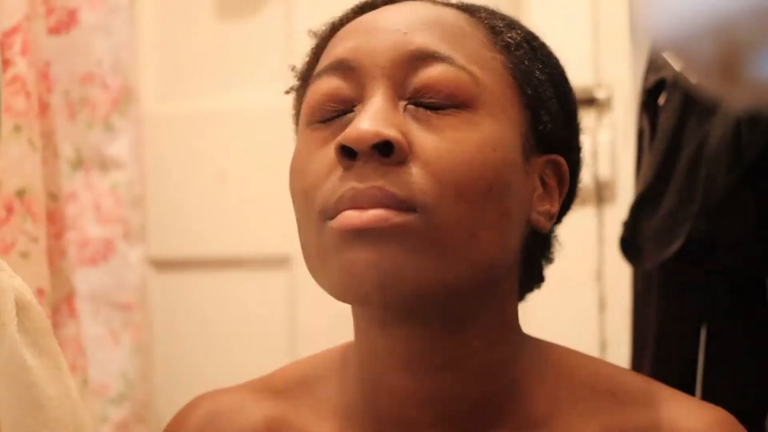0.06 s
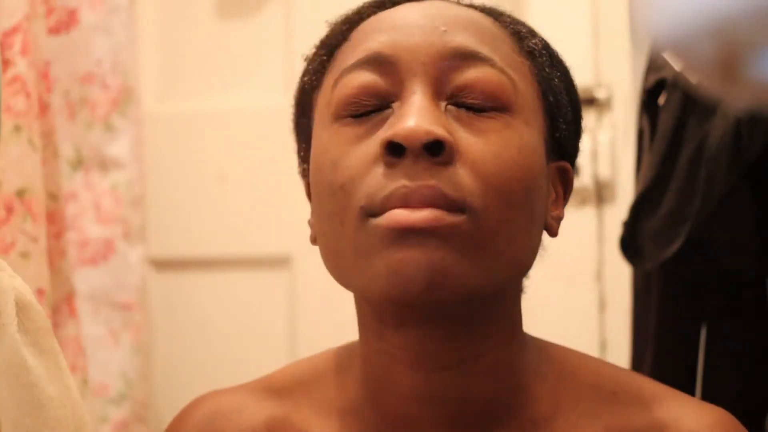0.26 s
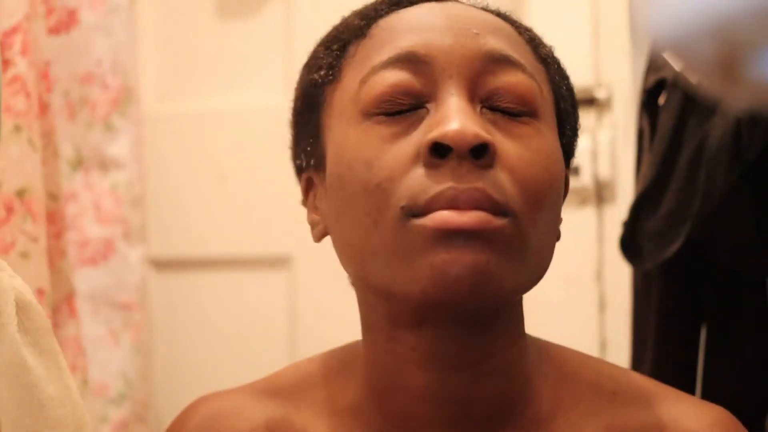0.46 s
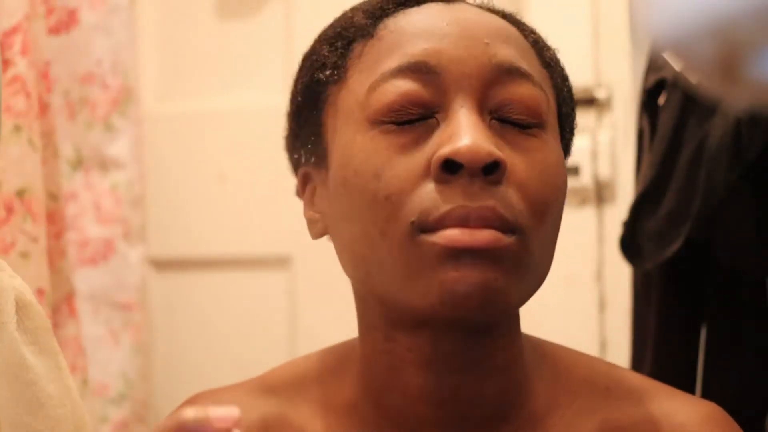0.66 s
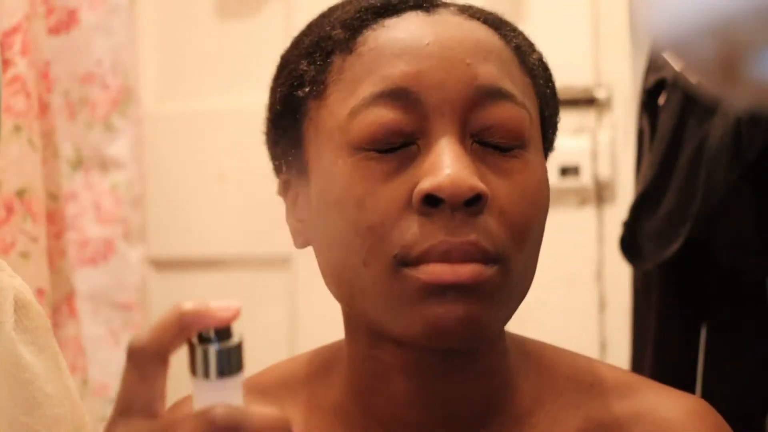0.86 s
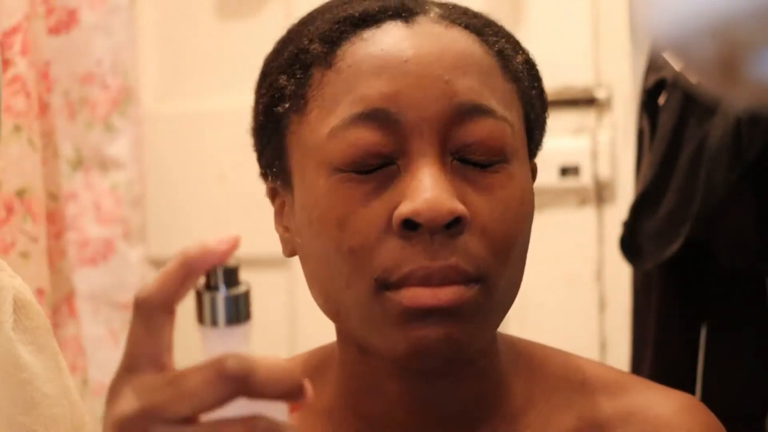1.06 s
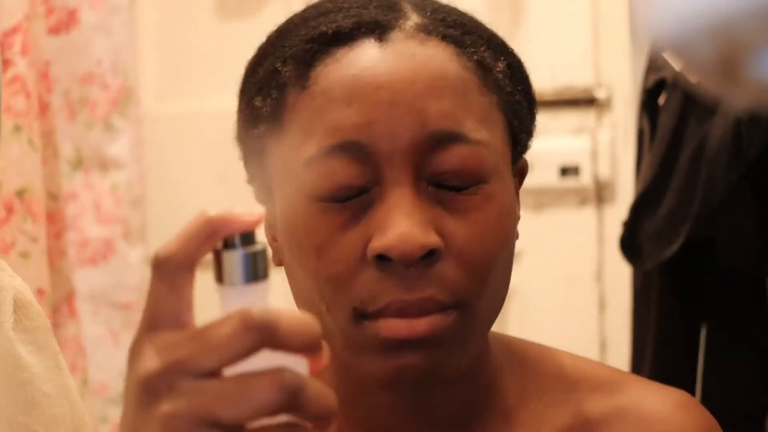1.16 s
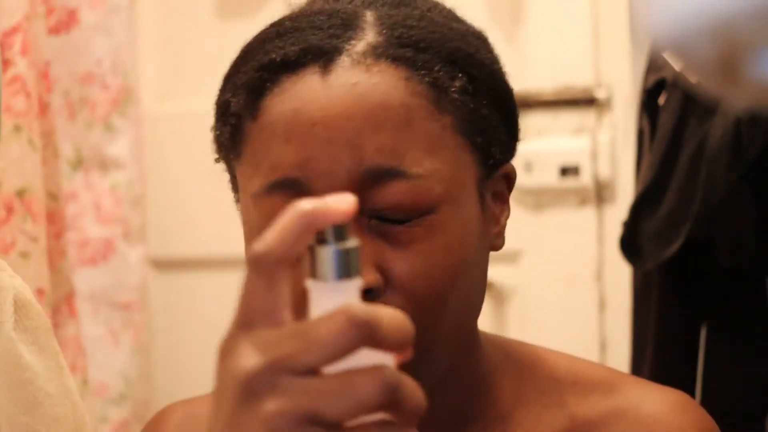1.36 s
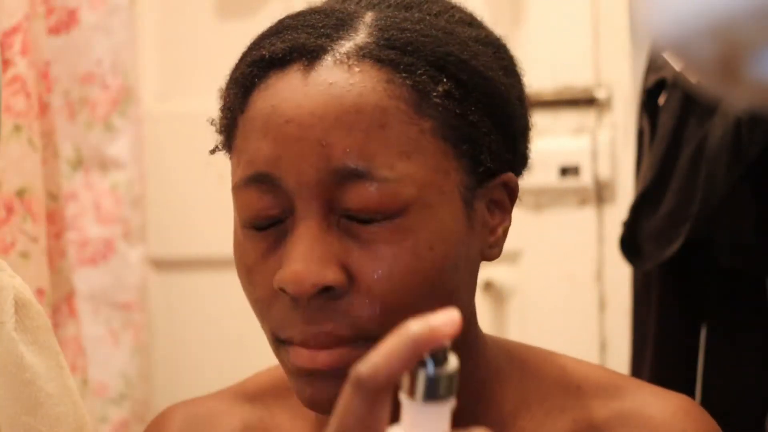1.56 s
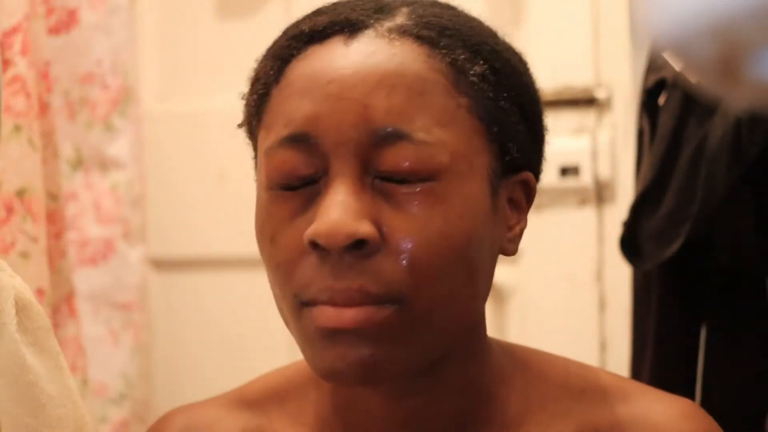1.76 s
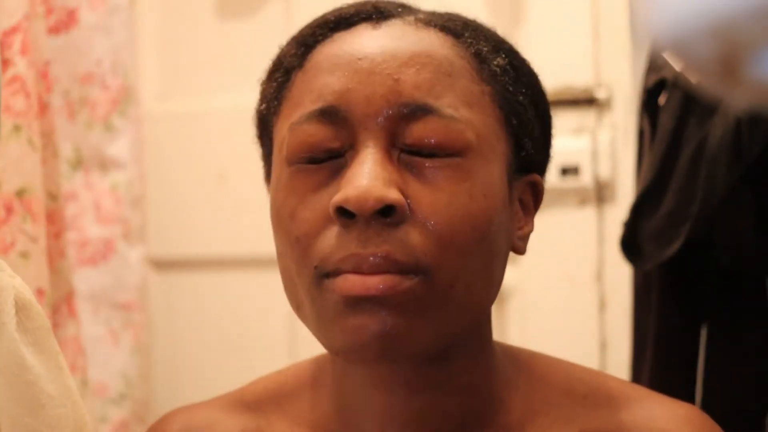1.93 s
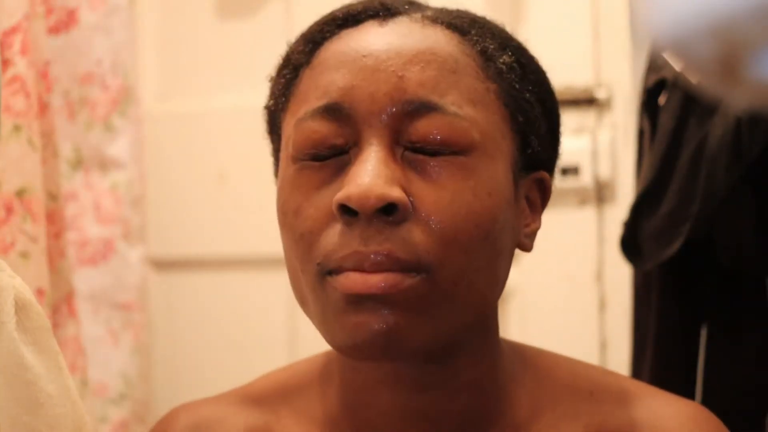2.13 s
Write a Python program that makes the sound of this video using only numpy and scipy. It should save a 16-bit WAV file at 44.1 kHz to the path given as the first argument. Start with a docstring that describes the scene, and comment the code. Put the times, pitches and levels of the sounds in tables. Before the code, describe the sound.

A small fine-mist spray bottle is pumped eight times, close to the microphone. Short, bright hisses come at about 0.1, 0.4, 0.6, 0.9, 1.2, 1.5, 1.7 and 2.0 seconds, each starting with a tiny spit and a slight plastic rub. Between sprays the plunger knocks lightly back and refills with a faint slurp. The bathroom's hard walls add a short echo over a quiet background.

```python
"""A small fine-mist pump bottle sprays eight times in a bathroom, close to the microphone.
The nozzle spits as the valve opens, then hisses with broadband noise that follows the flow.
Stick-slip friction of the piston drives the bottle's resonances on the way down; the plunger
knocks back up, and the pump refills with a small slurp. Hard walls add a short
reverberation, over a quiet background."""
import sys
import numpy as np
from scipy import signal
from scipy.fft import rfft, irfft
from scipy.io import wavfile
from scipy.ndimage import uniform_filter1d

SR = 44100
rng = np.random.default_rng(int(sys.argv[2]) if len(sys.argv) > 2 else 0)


def put_to_file(sound):
    """Save the sound as 16-bit audio at rate SR, in the file named by the first command-line argument."""
    columns = np.atleast_2d(sound).T  # one column per channel
    safe = np.clip(columns, -1, 1)
    whole_steps = np.round(safe * 32767)
    wavfile.write(sys.argv[1], SR, whole_steps.astype(np.int16))


N = 96755
T = np.arange(N) / SR
BIN_HZ = np.fft.rfftfreq(2 * N, 1 / SR)
SLIP_S = 0.0125   # from the start of a stroke to the seal's first slip

# Strokes of the pump. Each row: start and spray length in seconds, mist and spit levels in dB,
# time to the hardest push and its width in seconds, judder level in dB, spit decay in seconds,
# squelch level in dB. Levels in all tables are relative.
STROKES = [(0.0769, 0.13, -38.5, -39.5, 0.031, 0.011, -36.5, 0.042, -42.5),
           (.4000, 0.099, -38.5, -44, 0.0049, .010, -38.5, 0.029, -44),
           (0.6478, 0.13, -40.5, -39.5, 0.035, 0.019, -36.5, 0.06, -42),
           (0.9186, .120, -39, -38.5, 0.033, 0.019, -32.5, 0.022, -43),
           (1.1980, 0.13, -39.5, -38, 0.034, 0.025, -34, 0.047, -38.5),
           (1.4653, 0.11, -39, -37.5, 0.031, .017, -32.5, 0.031, -68),
           (1.7240, 0.099, -38, -38, 0.031, 0.022, -35, .030, -38.5),
           (1.9874, 0.078, -38.5, -40, 0.033, 0.027, -34.5, 0.044, -43.5)]
# Modes of the air pocket in the pump chamber. Each row: frequency and bandwidth in Hz, level in dB.
CHAMBER_MODES = [(324, 50, -19.5), (1060, 130, -12), (1972, 102, 1), (2580, 360, -10), (2850, 340, -5)]


def mist():
    """Flow noise: one patch of the cloud hisses in proportion to the flow, with a random flutter."""
    # Spectrum of the hiss. Each row: frequency in Hz, level in dB.
    spectrum = [(100, -56), (330, -14), (700, -6.5), (1200, -8), (2000, -3.5), (3000, 2.5), (4000, -0.5),
                (6200, 0), (10000, -2.5), (15500, -2.5)]
    flow = sum(from_db(db) * spray_flow(s, length) for s, length, db, *_ in STROKES)
    flutter, flutter_db = uniform_filter1d(noise(), size=200), 1.44
    hiss = flow * from_db(-flutter_db * flutter / flutter.std()) * noise()
    return through(hiss, response(spectrum))


def spray_flow(s, length):
    """Pressure-driven flow builds, sags with the pressure and dies as the piston bottoms out."""
    opening, rise_s, sag_db_per_s, release_db_per_s = 0.37, 0.06, 8.5, 405
    age = np.maximum(T - s, 0)
    build = (T > s) * np.minimum(opening + age / rise_s * (1 - opening), 1)
    return build * from_db(-sag_db_per_s * age - release_db_per_s * np.maximum(age - length, 0))


def nozzle():
    """Starting transient of the jet: the nozzle spits, fading as the mist forms."""
    # Spectrum of the spit. Each row: frequency in Hz, level in dB.
    spectrum = [(200, -34), (1200, -6), (3000, -23), (4800, -14), (6100, 0), (7300, -7), (8300, 5.5),
                (9500, -0.5), (10800, -11), (15500, -37)]
    spit = sum(from_db(db - 4) * burst(s, decay_s) for s, _, _, db, _, _, _, decay_s, _ in STROKES)
    return through(spit * noise(), response(spectrum))


def valve():
    """Brief transients are broadband: a bright tick as the valve opens, a weaker at the first slip."""
    # Spectrum of the tick. Each row: frequency in Hz, level in dB.
    spectrum = [(200, -13.5), (1200, -13), (2600, -6), (4000, -7.5), (6100, 1), (7400, -3.5), (9200, 3.5),
                (10500, -5.5), (15500, -11)]
    decay_s, rise_s = 0.0013, 0.0001
    ticks = 0
    for s, _, _, db, *_ in STROKES:
        pair = burst(s, decay_s, rise_s) + from_db(-3) * burst(s + SLIP_S, decay_s, rise_s)
        ticks += from_db(db + 8.5) * pair
    return through(ticks * noise(), response(spectrum))


def piston(bottle):
    """Stick-slip friction: the seal shakes the bottle in a quickening run, most at the hardest push."""
    # Spectrum of the rubbing seal. Each row: frequency in Hz, level in dB.
    rub_spectrum = [(150, -17), (400, -6), (1200, -7), (2800, -5), (3700, -6.5), (6000, -4.5), (9000, -7),
                    (15500, -19)]
    interval_ratio, jitter_s = 0.94, 0.00075
    delays = np.cumsum(SLIP_S * interval_ratio ** np.arange(10))
    slips, drag = 0, 0
    for s, length, _, _, peak_s, width_s, db, _, _ in STROKES:
        push = from_db(db + 8) * np.exp(-0.5 * abs((delays - peak_s) / width_s) ** 2.06)
        times = s + delays + rng.normal(0, jitter_s, len(delays))
        slips += sum(gain * burst(t, decay_s=0.0029) for t, gain in zip(times, push))
        drag += from_db(db - 21.5) * spray_flow(s, length)
    force = slips + drag
    judder = through(force * noise(), bottle)
    rub = through(force * noise(), response(rub_spectrum))
    return judder + from_db(-3.5) * rub


def bottle_ring():
    """Modal response of the bottle; a body small against the wavelength radiates little bass."""
    # Modes of the bottle and hand. Each row: frequency and bandwidth in Hz, level in dB.
    modes = [(275, 8, -23), (333.6, 23.5, 1), (370, 50, -4), (407.4, 55, -7.5), (481, 130, -9.5),
             (796, 17, -12), (860, 60, -6), (1102, 89, -9), (1448, 200, -11.5), (2015, 144, -5),
             (2086, 79, 1), (2520, 70, -2), (2900, 67, 0), (3213, 75, -8.5)]
    bass_cut = signal.butter(3, 245, "high", fs=SR, output="sos")
    radiation = signal.sosfreqz(bass_cut, BIN_HZ, fs=SR)[1]
    return resonances(modes) * radiation


def pump_head(bottle):
    """Impact excitation: the soft finger lands with a thud; hard snaps of the head ring the bottle."""
    # Snaps of the pump head. Each row: start in seconds, level in dB.
    snaps = [(0.3998, -30.5), (0.6773, -33), (1.4965, -29), (2.189, -38)]
    landings = from_db(-43.5) * sum(burst(s, decay_s=0.0096) for s, *_ in STROKES)
    thud = through(landings * noise(), resonator(hz=374, width_hz=37))
    grit = sum(from_db(db + 6.5) * burst(s, decay_s=0.00067) for s, db in snaps) * noise()
    return thud + through(from_db(19.5) * clicks(snaps) + grit, bottle)


def plunger(bottle):
    """Damped vibration after impact: the returning plunger knocks and rattles, and its spring clucks."""
    # Returns of the plunger. Each row: start in seconds, level in dB.
    returns = [(0.233, -40.5), (0.245, -38.5), (.529, -37), (0.776, -42), (0.798, -41), (1.076, -36),
               (1.356, -37.5), (1.614, -36.5), (1.887, -38.5), (2.13, -39.5)]
    # Spectra with which knock and rattle drive the bottle. Each row: frequency in Hz, level in dB.
    knock_spectrum = [(100, -24), (330, 1), (600, -3), (1000, -3.5), (1500, -10), (2000, -9.5), (3100, -14),
                      (4500, 1), (15000, -18)]
    rattle_spectrum = [(100, -14), (330, -8.5), (600, 0.5), (1000, -3.5), (1500, -4), (2000, -7.5),
                       (3100, -6), (4500, -19), (15000, -20)]
    knock = sum(from_db(db - 6.5) * burst(s, decay_s=0.0048) for s, db in returns) * noise()
    knock += from_db(21.5) * clicks(returns)
    rattle = sum(from_db(db - 13.5) * burst(s, decay_s=0.041) for s, db in returns) * noise()
    cluck = sum(from_db(db - 4) * burst(s + 0.00543, decay_s=0.0079) for s, db in returns) * noise()
    spring = resonator(hz=933, width_hz=546) ** 2   # two stages in series
    return (through(knock, bottle * response(knock_spectrum))
            + through(rattle, bottle * response(rattle_spectrum))
            + through(cluck, spring))


def squelch():
    """Cavity resonance: liquid rushing out excites the chamber, most just after the hardest push."""
    lag_s, width_s = 0.0033, 0.014
    rush = sum(from_db(db) * np.exp(-0.5 * ((T - s - peak_s - lag_s) / width_s) ** 2) * (T > s)
               for s, _, _, _, peak_s, _, _, _, db in STROKES)
    return through(rush * noise(), resonances(CHAMBER_MODES))


def refill():
    """Suction draws liquid past the inlet valve; the chamber resonates and a bubble rings."""
    # Refills of the pump. Each row: start in seconds, slurp level in dB, gurgle delay in seconds,
    # gurgle level in dB, bubble frequency in Hz.
    refills = [(.001, -52, 0.0049, -47.5, 2054), (.290, -51, 0.0036, -48.5, 2080),
               (0.36, -48.5, 0.0046, -71, 1920), (.577, -50, 0.011, -55, 2040),
               (0.853, -51, 0.0099, -55.5, 2620), (1.123, -51.5, 0.0066, -49, 2047),
               (1.402, -49.5, 0.0097, -52, 1900), (1.661, -50.5, 0.0091, -48.5, 1975),
               (1.937, -51, 0.005, -54, 2050)]
    # Spectrum of the slurp. Each row: frequency in Hz, level in dB.
    spectrum = [(200, -6), (1200, -7), (2800, 5.5), (3700, -4), (6600, 2), (7300, -4), (8400, -1.5),
                (10200, -12), (15500, -10)]
    decay_s = 0.014
    slurp, gurgle, bubble = 0, 0, 0
    for s, slurp_db, delay, db, hz in refills:
        slurp += from_db(slurp_db) * burst(s, decay_s)
        gurgle += from_db(db - 0.5) * burst(s + delay, decay_s, rise_s=0.003)
        tone = 2 * np.sin(2 * np.pi * hz * (T - s))
        bubble += from_db(db - 2) * burst(s + delay, decay_s, rise_s=0.0024) * tone
    inlet = through(slurp * noise(), response(spectrum))
    return inlet + through(gurgle * noise(), resonances(CHAMBER_MODES)) + bubble


def grip():
    """Sliding friction: skin rubs faintly on plastic."""
    # Shifts of the fingers. Each row: start in seconds, level in dB.
    shifts = [(1.905, -50), (1.917, -46), (1.961, -48)]
    rubs = sum(from_db(db) * burst(s, decay_s=0.006) for s, db in shifts)
    return through(rubs * noise(), resonator(hz=1130, width_hz=730) ** 2)


def bathroom(x, early_db):
    """Superposition of direct sound, echoes off face and hand, wall echoes and standing waves."""
    # Standing waves of the room. Each row: frequency and bandwidth in Hz, level in dB.
    room_modes = [(275, 5.5, -3), (314, 7.7, -2.5), (401.5, 32, 13)]
    right_lag_s, pan_db = 0.000024, 0.25
    direct = np.array([np.ones(N + 1), np.exp(-2j * np.pi * BIN_HZ * right_lag_s)])
    early = reflections(gap_s=0.001, t60_s=0.05, db=early_db)
    walls = reflections(gap_s=0.0024, t60_s=0.22, db=-6)
    paths = direct + rfft(early + walls, 2 * N) + from_db(-8) * resonances(room_modes)
    return irfft(rfft(x, 2 * N) * paths)[:, :N] * from_db([[-pan_db], [pan_db]])


def reflections(gap_s, t60_s, db):
    """Reverberation: dense echoes decay exponentially, with a given total level."""
    echoes = diffuse((T > gap_s) * from_db(-60 * T / t60_s))
    return from_db(db) * echoes / np.sqrt(np.sum(echoes ** 2) / 2)


def diffuse(envelope):
    """Diffuse field: stereo noise under an envelope, more alike in both ears in the bass."""
    # Stereo width of the room. Each row: frequency in Hz, side-to-mid ratio in dB.
    width = [(100, -4.5), (300, -7), (700, -0.5), (1500, 1.5), (5000, 1.5), (15000, -2)]
    mid = envelope * noise()
    side = irfft(rfft(envelope * noise(), 2 * N) * at_hz(width, BIN_HZ))[:N]
    return np.array([mid + side, mid - side])


def background():
    """Stationary noise: a quiet, diffuse rush, strongest at low frequencies."""
    # Spectrum of the background. Each row: frequency in Hz, level in dB.
    spectrum = [(20, -22), (55, -8), (90, -2), (140, -2), (220, -5), (350, 5.5), (700, -6), (2000, -10.5),
                (6000, -18.5), (15500, -27)]
    return from_db(-57.5) * np.array([through(channel, response(spectrum)) for channel in diffuse(1)])


def from_db(db):
    """Decibels to amplitude ratio."""
    return 10 ** (np.asarray(db) / 20)


def at_hz(points, hz):
    """Gain of a spectrum table, interpolated over log frequency."""
    f, db = np.transpose(points)
    return from_db(np.interp(np.log(hz + 1), np.log(f), db))


def response(points):
    """Minimum-phase response with the shape of a spectrum table."""
    cepstrum = irfft(np.log(at_hz(points, BIN_HZ)))
    cepstrum[1:N] *= 2
    cepstrum[N + 1:] = 0
    return np.exp(rfft(cepstrum))


def resonator(hz, width_hz):
    """Band-pass response of a damped oscillator."""
    z = np.exp(-2j * np.pi * BIN_HZ / SR)
    r = np.exp(-np.pi * width_hz / SR)
    poles = 1 - 2 * r * np.cos(2 * np.pi * hz / SR) * z + r * r * z * z
    return (1 - r * r) / 2 * (1 - z * z) / poles


def resonances(modes):
    """Modal superposition: modes below 600 Hz swing in step, higher ones alternate in sign."""
    return sum((1 if hz < 600 else (-1) ** k) * from_db(db) * resonator(hz, width_hz)
               for k, (hz, width_hz, db) in enumerate(modes))


def through(x, h):
    """Linear filtering by a response, keeping the power of white noise."""
    return irfft(rfft(x, 2 * N) * h / np.sqrt(np.mean(abs(h) ** 2)))[:N]


def noise():
    """Gaussian white noise."""
    return rng.standard_normal(N)


def burst(s, decay_s, rise_s=0.00085):
    """Envelope with a quick rise and an exponential decay."""
    age = np.maximum(T - s, 0)
    return (1 - np.exp(-age / rise_s)) * np.exp(-age / decay_s)


def clicks(rows):
    """Ideal impulses. Each row: time in seconds, level in dB."""
    out = np.zeros(N)
    for s, db in rows:
        out[min(int(s * SR), N - 1)] += from_db(db)
    return out


def scene():
    """Incoherent sources add in power: cloud, liquid and body, each with its own echoes."""
    bottle, patches = bottle_ring(), 4
    cloud = sum(bathroom(mist(), early_db=2) for _ in range(patches)) / np.sqrt(patches)
    liquid = bathroom(squelch() + refill() + nozzle(), early_db=-1)
    body = bathroom(valve() + piston(bottle) + pump_head(bottle) + plunger(bottle) + grip(), early_db=0)
    return cloud + liquid + body + background()


def record(dry):
    """Band limiting: a steep low-pass removes the treble above 16 kHz."""
    return signal.sosfilt(signal.ellip(12, 0.1, 80, 16000, fs=SR, output="sos"), dry)


dry = scene()
out = record(dry)
put_to_file(out)
```